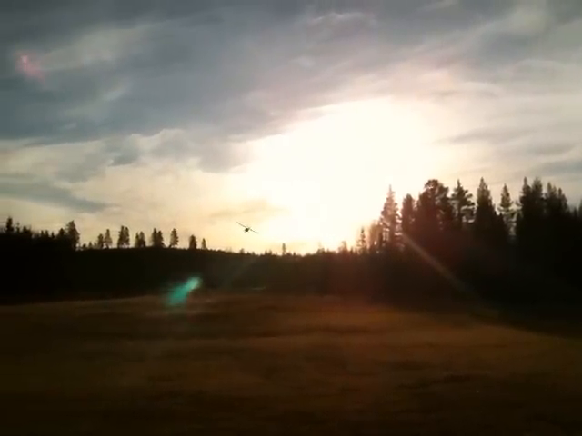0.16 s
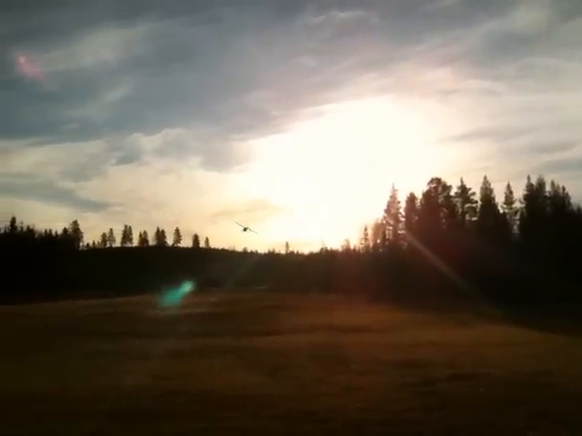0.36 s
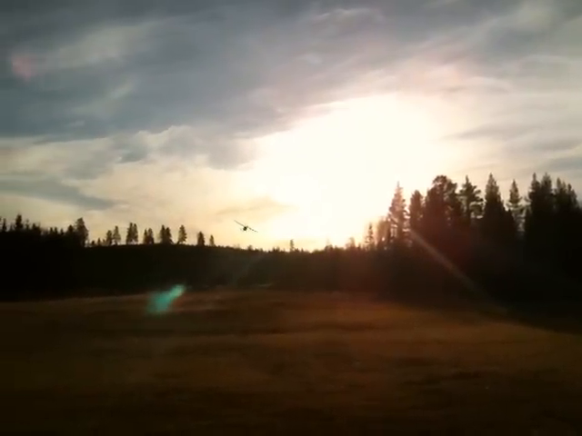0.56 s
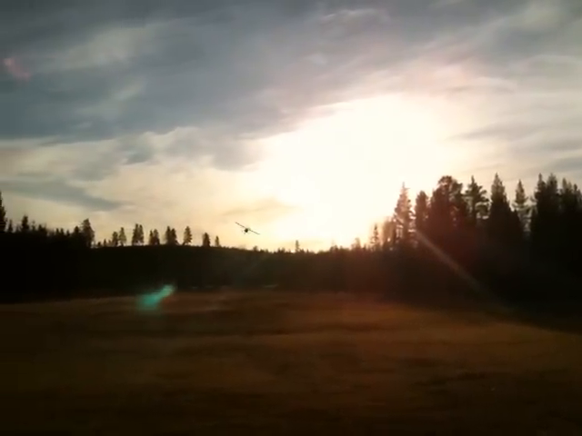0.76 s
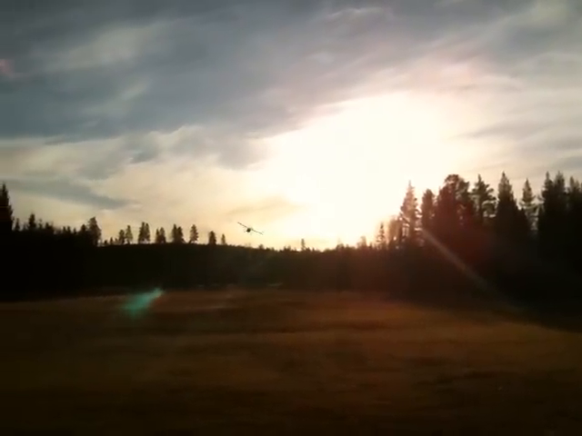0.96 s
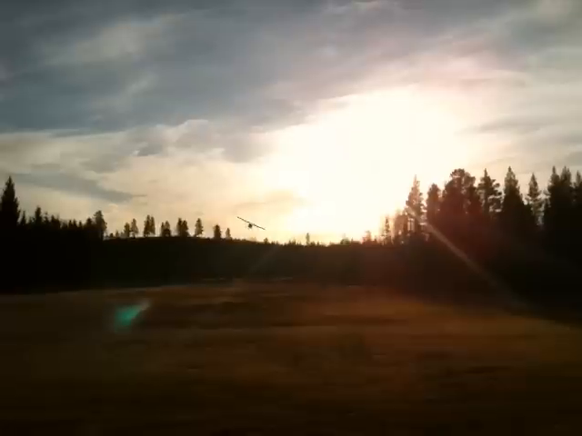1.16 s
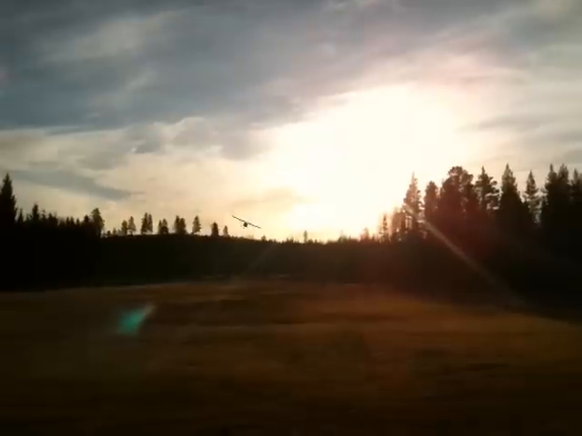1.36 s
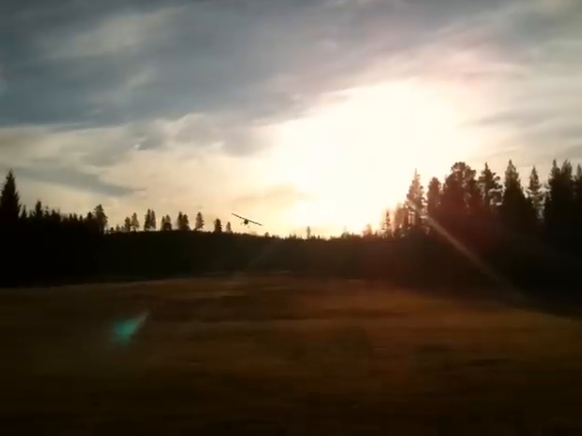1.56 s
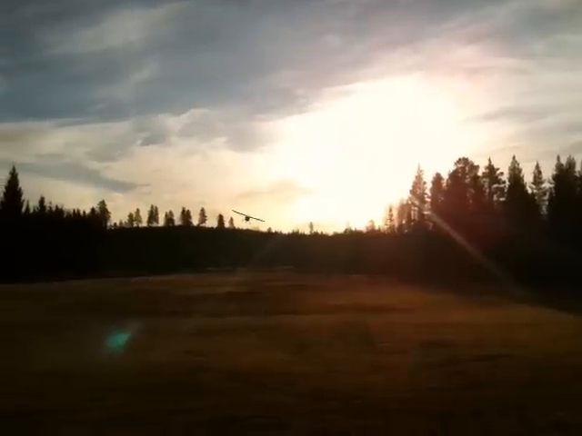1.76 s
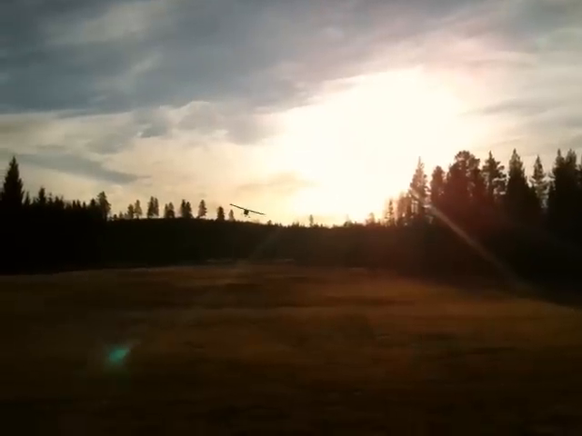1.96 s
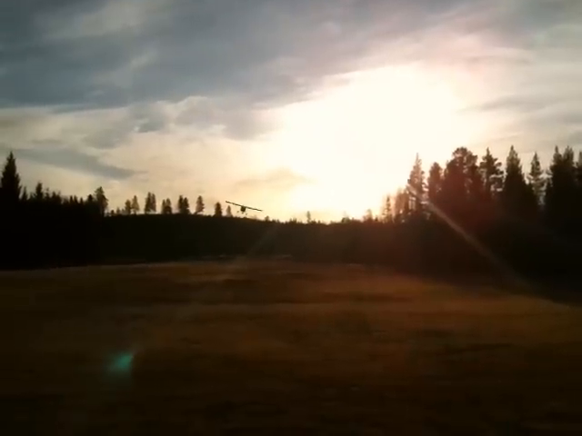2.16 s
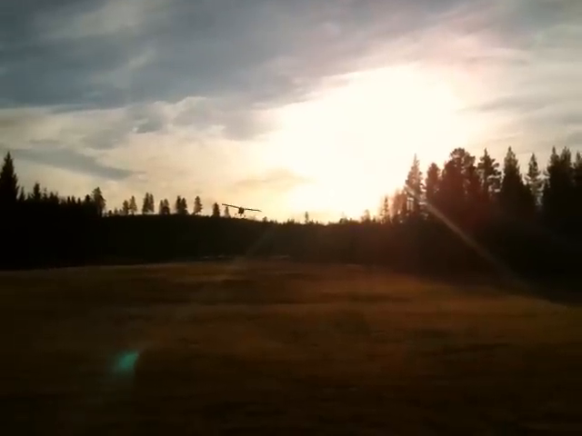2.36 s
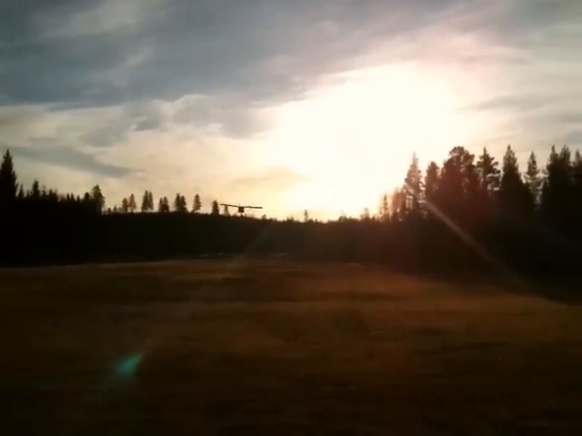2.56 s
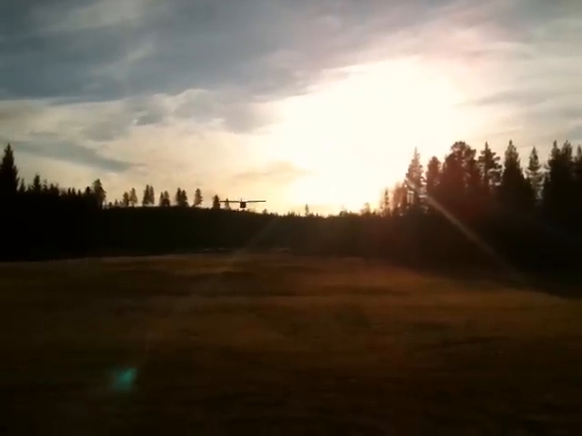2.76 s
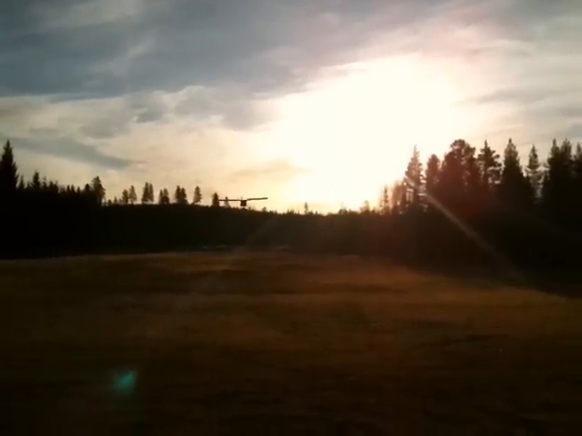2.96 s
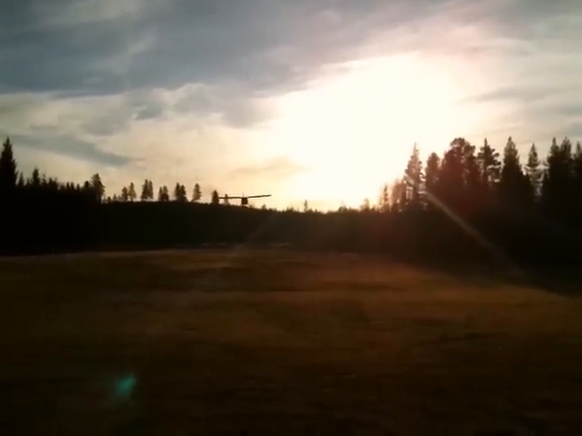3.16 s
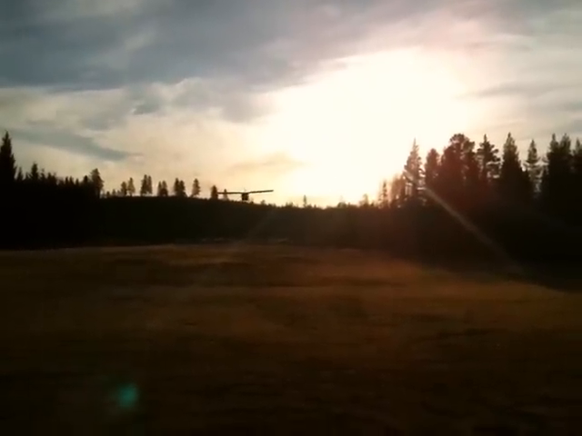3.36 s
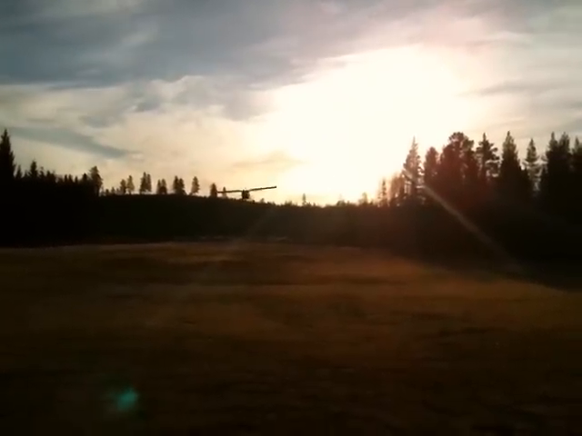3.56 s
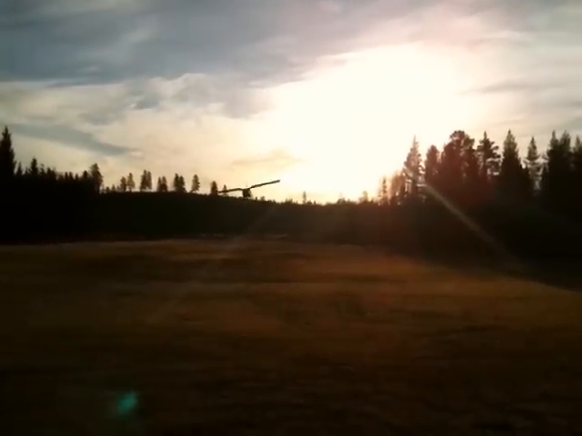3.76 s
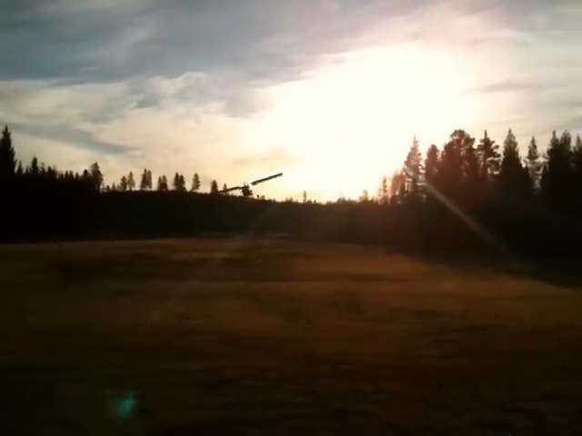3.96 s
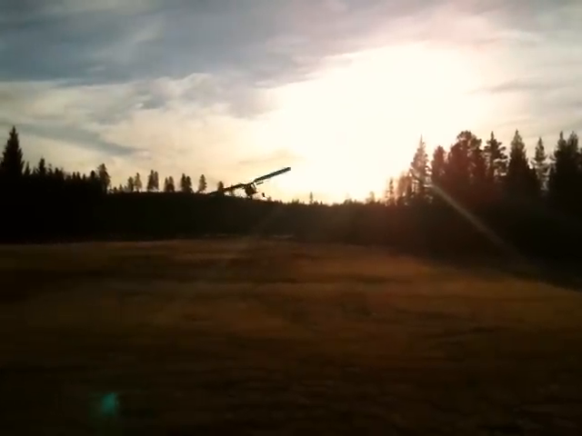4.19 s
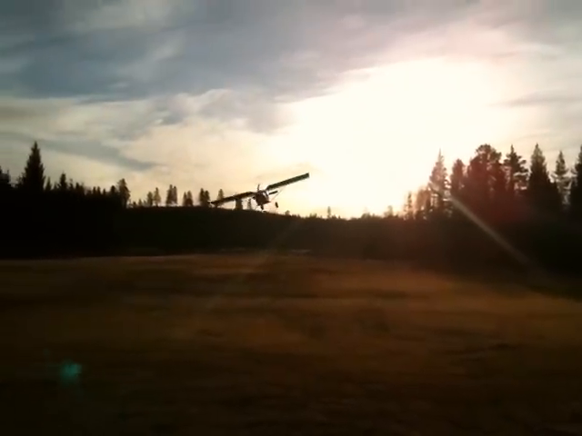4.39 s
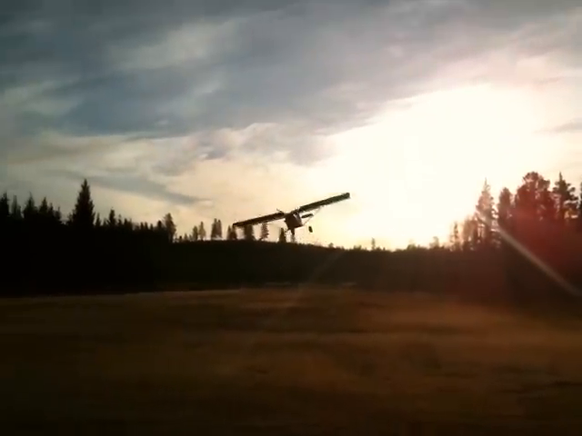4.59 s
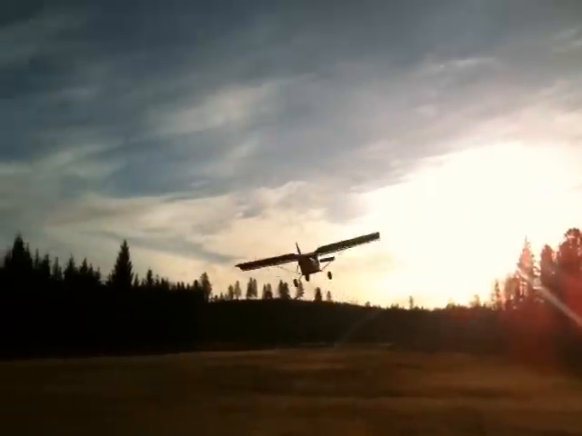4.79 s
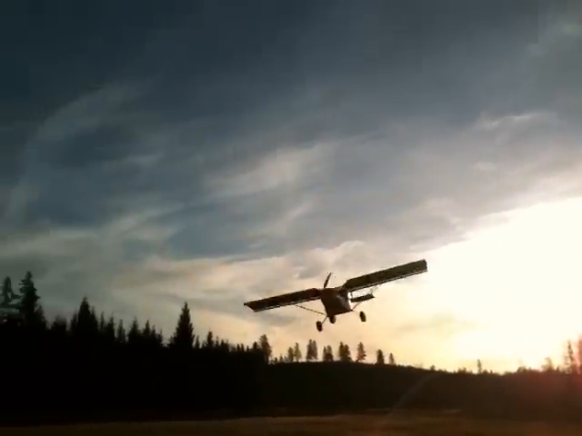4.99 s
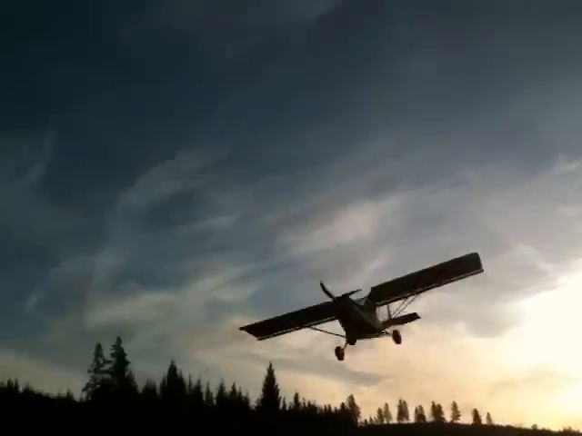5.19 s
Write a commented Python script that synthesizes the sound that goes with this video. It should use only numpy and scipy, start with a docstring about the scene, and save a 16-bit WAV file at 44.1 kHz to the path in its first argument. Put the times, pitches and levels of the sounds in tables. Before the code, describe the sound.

Outdoors on a quiet field, one small plane flies towards a handheld camera. First a faint, muffled hum in a wide breathy roar; then the throttle opens and the note rises smoothly to a harder, nasal buzz with a gear whine. The pitch then stays level as the sound gets much louder, brighter and grittier until the cut. Mono, dry, slight wavering, ground reflection colouring the tone.

```python
"""A steady drone in a wide roar comes first: a light aircraft flies in low over a grass field.
It has a geared four-cylinder engine and a three-blade propeller, and the pilot opens the throttle.
Exhaust, blades and reduction gear are sets of sine waves tied to the engine speed; the roar is shaped noise.
The echo off the ground combs the sound and the air dulls it; a soft low burst is added.
Behind it lie the hiss of the open air and a mono camera, and the camera's faint high whine."""
import sys
import numpy as np
from scipy import signal
from scipy.io import wavfile
from scipy.ndimage import uniform_filter1d

SR = 44100
rng = np.random.default_rng(int(sys.argv[2]) if len(sys.argv) > 2 else 0)


def materialize(psi):
    """Save the field psi as 16-bit PCM at rate SR to the path in sys.argv[1].

    A 1-D psi becomes a single channel; in a 2-D psi each row is a channel.
    """
    bounded = np.clip(np.atleast_2d(psi).T, -1, 1)
    quanta = np.round(bounded * 32767).astype(np.int16)
    wavfile.write(sys.argv[1], SR, quanta)


def volts_from_decibels(level):
    """Turn decibel levels (scalar or array-like) into linear amplitude factors."""
    exponent = np.asarray(level, float) / 20
    return 10 ** exponent


N = 230890

# slow changes are worked out once per hop; HOP and SIZE in samples, FRAMES in seconds
HOP, SIZE = 256, 1024
FRAMES = np.arange(N // HOP + 5) * HOP / SR

# An "order" is a multiple of the engine cycle; one cycle is two crank turns.
# "Three levels" are: part throttle/dB, full throttle/dB, seen from below/dB.

# engine speed as heard: t/s, cycles per second/Hz
ENGINE_SPEED = [(0.0, 32.93), (0.8, 33.62), (1.0, 34.08), (1.6, 35.85), (2.0, 37.87), (2.2, 39.6),
                (2.4, 41.08), (2.6, 41.87), (3.0, 41.99), (3.8, 42.07), (4.4, 41.93), (5.0, 41.81),
                (5.24, 41.63)]
PART_THROTTLE_HZ, FULL_THROTTLE_HZ = 35.65, 41.5  # the throttle opens between these cycle rates

# straight approach, with the sound travelling at SOUND_M_PER_S
START_M, CLOSING_M_PER_S = 164.3, 28.18
MIC_HEIGHT_M, SOUND_M_PER_S = 1.6, 343
BELOW_STARTS_M, BELOW_FULL_M = 55.5, 21.3  # the belly turns towards the listener between these distances
# height of the aircraft, which sinks, then pulls up: t/s, height/m
AIRCRAFT_HEIGHT = [(0, 24), (.5, 22.7), (1, 19.5), (2.1, 14.14), (2.6, 11.2), (4, 5.6), (4.45, 4.7),
                   (4.77, 4.55), (5.0, 5.3), (5.13, 5.4), (5.24, 5)]
# power keeps building after the engine speed has settled: t/s, loudness at one metre/dB
ENGINE_POWER = [(0, -14.5), (1, -14.5), (1.8, -13), (2.1, -9.5), (2.35, -7.5), (3.3, -6), (3.9, -4.5),
                (4.5, -4), (5, -5), (5.24, -5.5)]
# head on, the treble grows faster than the power
BITE_HZ, BITE_PIVOT_DB, BITE_DB_PER_DB = 6000, -5, 1.65

# echo off flat grass: f/Hz, share reflected (0-1), phase lag/turns
GRASS_ECHO = [(101, 0.64, 0.026), (330, 0.73, 0.12), (970, 0.55, 0.15), (1230, 0.47, 0.27),
              (1700, 0.46, 0.34), (2100, 0.49, 0.25), (2980, 0.34, 0.21), (3700, 0.25, 0.22),
              (4470, 0.14, 0.16), (5600, 0.1, 0.2), (7000, 0.05, 0.19)]
STEEP_ECHO_LOSS = 0.3  # share of the echo lost when the sound comes down steeply
SCATTER_HZ = 900  # tufts then scatter the echo above this pitch
AIR_DB_PER_M = 0.0039  # loss at 1 kHz
WAVER_S = 0.00006  # eddies jitter the travel time of the sound

# exhaust tones: order of each
EXHAUST_ORDERS = (4, 6, 8, 10, 11, 12, 14, 15, 16, 17, 18, 20, 21, 22, 23, 25, 26, 30, 33, 38, 9, 47, 59,
                  61, 63, 67, 80, 101, 24, 57, 58, 62, 66, 89, 100, 110)
# their strength over the engine's loudness, one row per order: three levels/dB
EXHAUST_LEVELS = [(-8.5, -7.5, -10), (0, -15, -17), (-5.5, -39, -20), (-17, -29, -21), (-35, -5.5, -8),
                  (-28, -17, -19), (-17, -15, -36), (-20, -20.5, -29), (-7, -15, -18), (-26, -19.5, -35),
                  (-21, -19.5, -36), (-21.5, -18, -9.5), (-31, -17.5, -24), (-23.5, -16, -15),
                  (-21.5, -22, -28), (-24, -33, -23), (-16, -38, -36), (-28, -36, -34), (-22, -24, -36),
                  (-29, -20, -35), (-31, -37, -17.5), (-36, -31, -18), (-35, -22, -28), (-37, -27, -25),
                  (-34, -24, -25), (-32, -19, -24), (-19, -27, -30), (-32, -22, -32), (-13, -34, -37),
                  (-36, -26, -24), (-36, -29, -25), (-36, -26, -29), (-36, -25, -24), (-36, -24, -22),
                  (-36, -21, -30), (-36, -22, -25)]
PIPE_HZ, PIPE_WIDTH_HZ, PIPE_DB = 625.6, 45, 17.5  # the silencer rings here
# exhaust tones that are weaker until the engine takes load: order of each
LOADED_ORDERS = (4, 14, 16, 17, 23, 24)
# what those tones lack before the load comes on: change of level/dB
UNLOADED_DB = (-5, -3, -20, -4, -12, -16)
LOAD_STARTS_HZ, LOAD_FULL_HZ = 34, 35.1  # cycle rates at which the load comes on
DIP_S, DIP_WIDTH_S, DIP_DB = 1.584, 0.043, -12  # the exhaust tones dip briefly

PROP = 42 / 51  # propeller turns per engine cycle
BLADE_COUNT = 3
# blade pass and its overtones, one row each: three levels/dB
BLADE_LEVELS = [(-17, -18, -18.5), (-11.5, -9.5, -10), (-15, -5, -11), (-26, -16, -13), (-19, -26, -19)]
SAG_S, SAG_WIDTH_S, SAG_DB = 4.05, .75, -12  # the third blade tone sags for a while

MESH = 42  # gear teeth meeting per engine cycle
# gear mesh in the middle row, side tones one propeller turn apart around it: three levels/dB
GEAR_LEVELS = [(-24, -34, -17), (-24, -21, -15), (-13.5, -12, -15.5), (-17, -14.5, -22), (-16.5, -17, -11),
               (-26, -18.5, -14.5), (-35, -18.5, -16.5)]
# twice the mesh rate, then one blade pass above it: three levels/dB
MESH_OCTAVE_LEVELS = [(-26, -16.5, -26), (-38, -30, -18.5)]
# the gear whine fades around this cycle rate, while the engine spins up
SLACK_HZ, SLACK_WIDTH_HZ, SLACK_DB = 37.5, 1.44, -12

# a fainter hum and its octave, off the firing orders: order of each
HUM_ORDERS = (6.33, 12.65)
# strength of the two hum tones, one row each: three levels/dB
HUM_LEVELS = [(-30, -37, -13), (-28, -17, -8.5)]

# noise of airflow and exhaust before air, ground and ROAR_DB act: f/Hz, then per 1 kHz of width, three levels/dB
ROAR_SPECTRUM = [(40, -38, -39, -44), (65, -32, -37, -38), (85.5, -22, -32, -28), (150.5, 0.5, -0.5, -1),
                 (238, 11, 0.5, -0.5), (348, -1, -4.5, -3), (482, 5, 6, 1), (603, 3.5, 2, 0.5),
                 (740, -5, -5, 1), (1080, -2.5, -5.5, -6), (1460, -4.5, -10, -10.5), (1650, -7, -9.5, -12),
                 (1830, -8, -8, -12), (2070, -8, -7.5, -11), (2390, -3.5, -5.5, -7.5), (3070, -8, -9, -10),
                 (3400, -9.5, -7.5, -10.5), (3700, -9.5, -8, -9), (4060, -8, -8.5, -10),
                 (4430, -5.5, -5.5, -11.5), (4600, -5, -3.5, -8.5), (4920, -8, -9.5, -13.5),
                 (5220, -7, -6.5, -11), (5500, -7, -9, -13.5), (7230, -6.5, -8.5, -14), (9740, 0, -19, -18),
                 (11500, -30, -36, -24.5), (15500, -36, -37, -24)]
ROAR_DB = 1.05  # added to the whole roar

BUMP_S, BUMP_HZ, BUMP_WIDTH_S, BUMP_DB = 2.63, 200, 0.033, -46.5  # a brief low swell in the drone

# still air over the field and the camera's own noise: f/Hz, level per Hz/dB
HISS_SPECTRUM = [(30, -122), (60, -118), (100, -108), (400, -108), (2000, -112), (6000, -116),
                 (10000, -118), (12000, -121), (15500, -124)]
# whine of the camera electronics: f/Hz, level/dB
CAMERA_WHINE = [(14971, -85), (15030, -81), (15089, -92)]
BASS_CUT_HZ = 81


def curve(rows, t):
    """Reads the columns of a time table at times t."""
    s, *columns = np.transpose(rows)
    return [np.interp(t, s, c) for c in columns]


def read(rows, hz):
    """Reads the columns of a frequency table, on a log axis."""
    f, *columns = np.transpose(rows)
    return [np.interp(np.log(hz + 1), np.log(f + 1), c) for c in columns]


def bell(x, centre, width):
    """Smooth hump that is 1 at the centre."""
    return np.exp(-((x - centre) / width) ** 2)


def drift(count, seconds, size=1):
    """Smooth random field of rms 1, count rows x frames, alike over size rows."""
    field = rng.standard_normal((len(FRAMES), count)).T
    field = uniform_filter1d(field, max(round(seconds * SR / HOP), 1), axis=1)
    field = uniform_filter1d(field, size=size, axis=0)
    return field / field.std()


def noise(magnitude):
    """Noise whose strength per Hz follows a bins x frames magnitude."""
    real, imaginary = rng.standard_normal((len(FRAMES), SIZE // 2 + 1, 2)).T
    spectrum = (real + 1j * imaginary) * magnitude * np.sqrt(1.5 * SR / SIZE)
    return signal.istft(spectrum, nperseg=SIZE, noverlap=SIZE - HOP)[1][:N]


def engine_hz():
    """Engine cycles per second at each frame."""
    return curve(ENGINE_SPEED, FRAMES)[0]


def flight():
    """Distance in m, lateness of the ground echo in s, view from below 0-1 and throttle 0-1."""
    metres = np.maximum(START_M - CLOSING_M_PER_S * FRAMES, 8)
    # the bounced path is longer by about 2 x mic height x aircraft height / distance
    echo_s = 2 * MIC_HEIGHT_M * curve(AIRCRAFT_HEIGHT, FRAMES)[0] / metres / SOUND_M_PER_S
    below = np.clip((BELOW_STARTS_M - metres) / (BELOW_STARTS_M - BELOW_FULL_M), 0, 1) ** 1.83
    speed_up = (engine_hz() - PART_THROTTLE_HZ) / (FULL_THROTTLE_HZ - PART_THROTTLE_HZ)
    throttle = np.clip(speed_up, 0, 1) ** 1.34
    return metres, echo_s, below, throttle


def blend(part_db, full_db, below_db):
    """Level between part throttle, full throttle and the view from below."""
    below, throttle = flight()[2:]
    return part_db + throttle * (full_db - part_db) + below * (below_db - full_db)


def path(hz):
    """Gain from aircraft to microphone: power, spreading, air loss growing with pitch, direct sound plus echo."""
    metres, echo_s, below, throttle = flight()
    power_db = curve(ENGINE_POWER, FRAMES)[0]
    share, lag = read(GRASS_ECHO, hz)
    steep_loss = 1 - STEEP_ECHO_LOSS * below
    scatter = np.exp(-(below * hz / SCATTER_HZ) ** 2)
    share = np.clip(share * steep_loss * scatter, 0, .95)
    # the late echo adds to some pitches and cancels others
    comb = abs(1 + share * np.exp(-2j * np.pi * (hz * echo_s + lag))) / np.sqrt(1 + share ** 2)
    head_on = np.sqrt(throttle) * (1 - below)
    bite_db = BITE_DB_PER_DB * (power_db - BITE_PIVOT_DB) * head_on * (hz / BITE_HZ) ** 1.7
    air_db = AIR_DB_PER_M * (hz / 1000) ** 1.861 * metres
    return comb * volts_from_decibels(power_db + bite_db - air_db) / metres


def lines(orders, levels_db, waver_db, waver_s):
    """Sines locked to the engine; eddies in the air make each waver in level and arrival, the high ones most."""
    t = np.arange(N) / SR
    cycles = np.cumsum(curve(ENGINE_SPEED, t)[0]) / SR
    swell = drift(len(orders), .11)
    slip = drift(len(orders), .07)
    out = np.zeros(N)
    for order, db, up, late in zip(orders, levels_db, swell, slip):
        hz = order * engine_hz()
        gain = path(hz) * volts_from_decibels(db + waver_db * np.minimum(hz / 630, 1.6) * up)
        slip_turns = waver_s * np.minimum(hz, 1800) * late
        phase = order * cycles + rng.random() + np.interp(t, FRAMES, slip_turns)
        out += np.sqrt(2) * np.interp(t, FRAMES, gain) * np.sin(2 * np.pi * phase)
    return out


def exhaust():
    """Exhaust pulses make tones at multiples of the cycle; those near the silencer resonance swell."""
    speed = engine_hz()
    off_pipe = (np.outer(EXHAUST_ORDERS, speed) - PIPE_HZ) / (PIPE_WIDTH_HZ / 2)
    pipe_db = PIPE_DB / (1 + off_pipe ** 2)
    load = np.clip((speed - LOAD_STARTS_HZ) / (LOAD_FULL_HZ - LOAD_STARTS_HZ), 0, 1)
    unloaded = dict(zip(LOADED_ORDERS, UNLOADED_DB))
    missing_db = np.outer([unloaded.get(order, 0) for order in EXHAUST_ORDERS], 1 - load)
    levels_db = np.array([blend(*row) for row in EXHAUST_LEVELS]) + missing_db + pipe_db
    levels_db += DIP_DB * bell(FRAMES, DIP_S, DIP_WIDTH_S)
    return lines(EXHAUST_ORDERS, levels_db, waver_db=2.6, waver_s=WAVER_S)


def propeller():
    """Each passing blade pushes the air, giving a blade-pass tone and its overtones."""
    orders = BLADE_COUNT * PROP * np.arange(1, len(BLADE_LEVELS) + 1)
    levels_db = [blend(*row) for row in BLADE_LEVELS]
    levels_db[2] = levels_db[2] + SAG_DB * bell(FRAMES, SAG_S, SAG_WIDTH_S)
    return lines(orders, levels_db, waver_db=3.0, waver_s=WAVER_S)


def gearbox():
    """Meeting gear teeth whine; the propeller shaft wobbles the whine once a turn, which adds side tones."""
    side_steps = np.arange(len(GEAR_LEVELS)) - len(GEAR_LEVELS) // 2
    octave_orders = [2 * MESH, 2 * MESH + BLADE_COUNT * PROP]
    orders = np.append(MESH + PROP * side_steps, octave_orders)
    slack_db = SLACK_DB * bell(engine_hz(), SLACK_HZ, SLACK_WIDTH_HZ)
    levels_db = [blend(*row) + slack_db for row in [*GEAR_LEVELS, *MESH_OCTAVE_LEVELS]]
    return lines(orders, levels_db, waver_db=2.0, waver_s=.000085)


def hum():
    """A pair of engine-locked tones that comes up as the aircraft draws near."""
    return lines(HUM_ORDERS, [blend(*row) for row in HUM_LEVELS], waver_db=2.4, waver_s=0.00013)


def roar():
    """Patchy wide noise, lumpier close by, chopped by the firings, one cylinder stronger than the rest."""
    hz = np.fft.rfftfreq(SIZE, 1 / SR)[:, None]
    patches_db = 1.0 * drift(len(hz), .06, size=16)
    patches_db = patches_db + 1.8 * flight()[2] * drift(len(hz), .015, size=12)  # more when seen from below
    level_db = ROAR_DB + blend(*read(ROAR_SPECTRUM, hz)) + patches_db
    per_hz = volts_from_decibels(level_db) / np.sqrt(1000)  # from 1 kHz of width to 1 Hz
    cycle_phase = 2 * np.pi * np.cumsum(curve(ENGINE_SPEED, np.arange(N) / SR)[0]) / SR
    firing_phase = 4 * cycle_phase  # four cylinders fire per cycle
    chop = 1 + 0.073 * np.sin(cycle_phase) + 0.11 * np.sin(firing_phase)
    return noise(path(hz) * per_hz) * chop


def bump():
    """One soft, short, low tone burst under a bell-shaped swell, set directly at the microphone's level."""
    t = np.arange(N) / SR - BUMP_S
    tone = np.sin(2 * np.pi * (BUMP_HZ * t + rng.random()))
    return np.sqrt(2) * volts_from_decibels(BUMP_DB) * bell(t, 0, BUMP_WIDTH_S) * tone


def camera_noise():
    """Steady hiss of still air and camera, plus a cluster of high sines from the camera electronics."""
    hz = np.fft.rfftfreq(SIZE, 1 / SR)[:, None]
    t = np.arange(N) / SR
    whine = np.zeros(N)
    for f, db in CAMERA_WHINE:
        whine += np.sqrt(2) * volts_from_decibels(db) * np.sin(2 * np.pi * (f * t + rng.random()))
    hiss = noise(volts_from_decibels(read(HISS_SPECTRUM, hz)[0]))
    return hiss + whine


def scene():
    """Adds all the sounds; one microphone feeds both channels."""
    aircraft = exhaust() + propeller() + gearbox() + hum() + roar() + bump()
    return np.tile(aircraft + camera_noise(), (2, 1))


def top_cut(x):
    """Nothing passes above the cut-off."""
    return signal.sosfilt(signal.butter(12, 15780, fs=SR, output="sos"), x)


def record(dry):
    """The microphone drops the deep bass."""
    bass_cut = signal.butter(2, BASS_CUT_HZ, "high", fs=SR, output="sos")
    thinned = signal.sosfilt(bass_cut, dry)
    return top_cut(thinned)


dry = scene()
out = record(dry)
materialize(out)
```